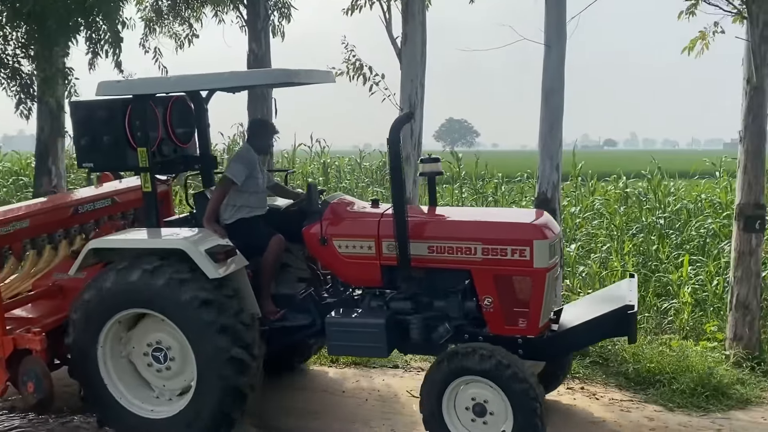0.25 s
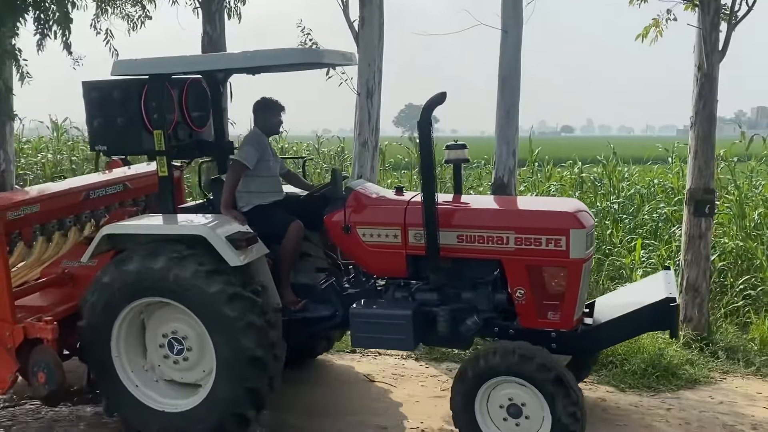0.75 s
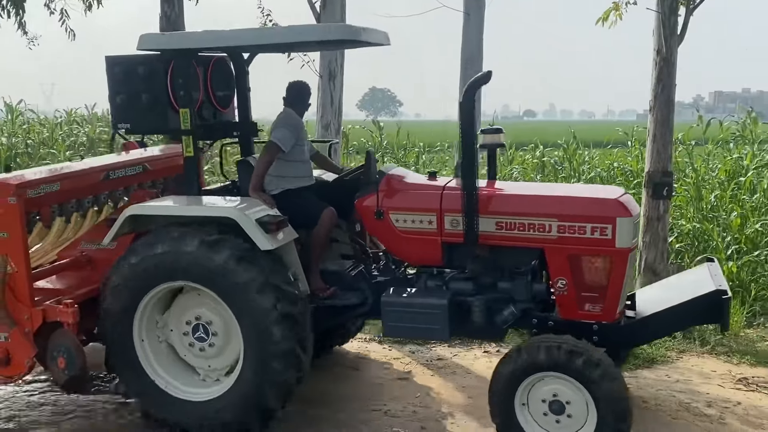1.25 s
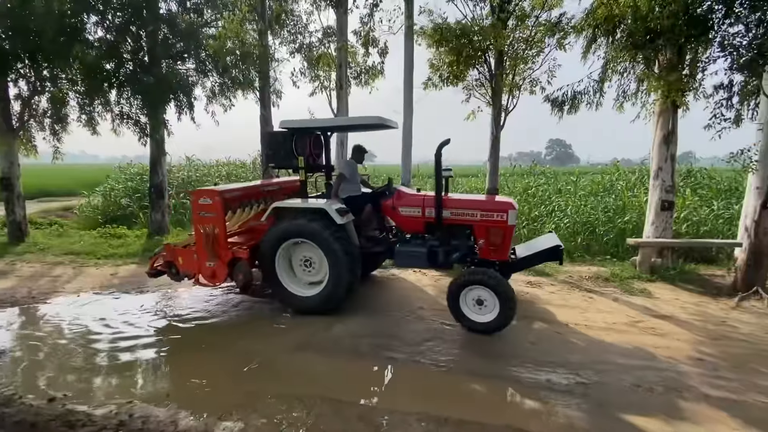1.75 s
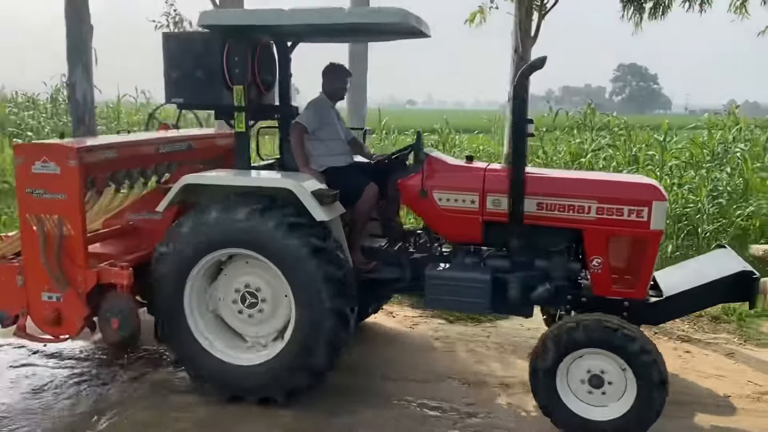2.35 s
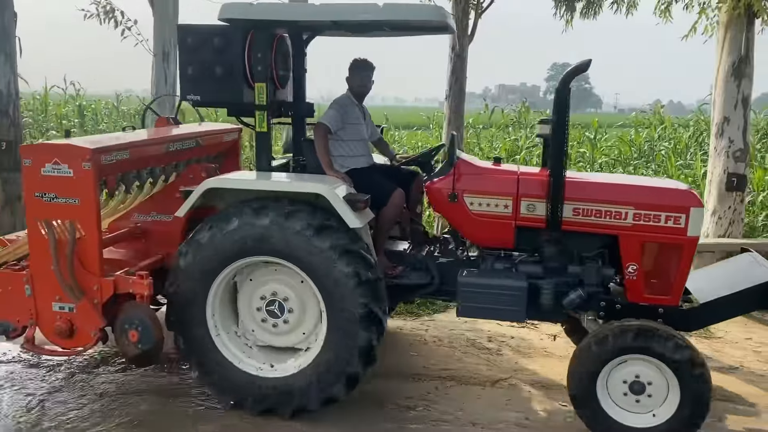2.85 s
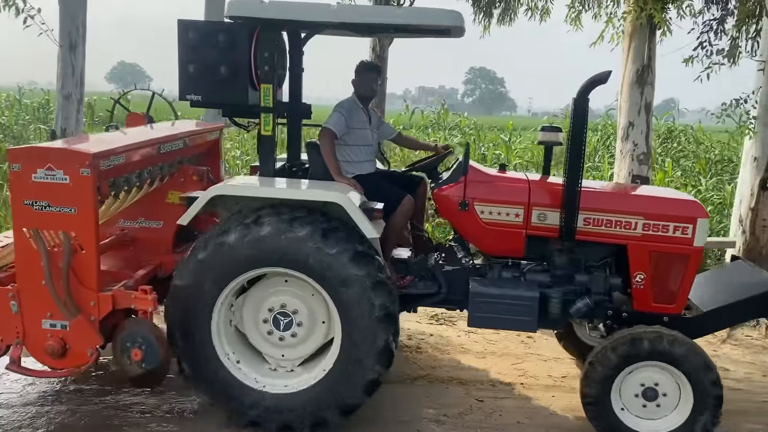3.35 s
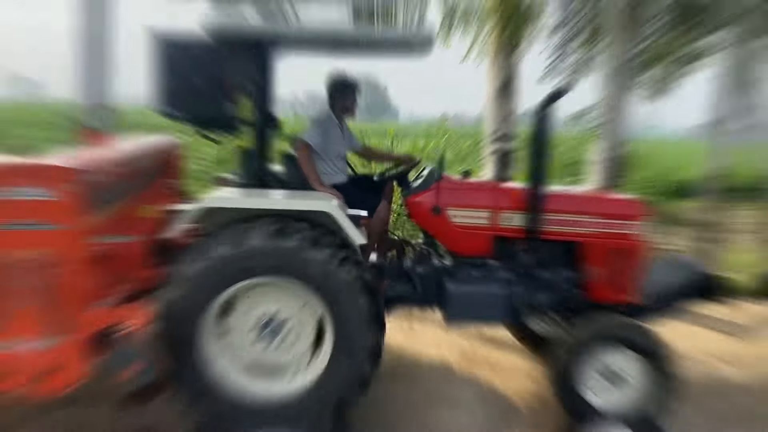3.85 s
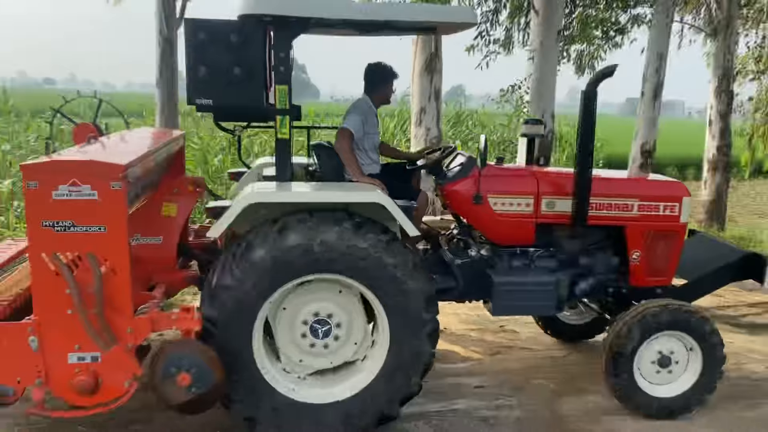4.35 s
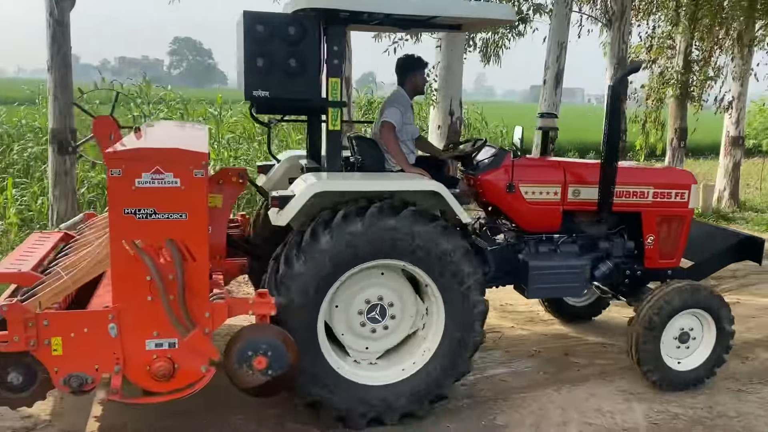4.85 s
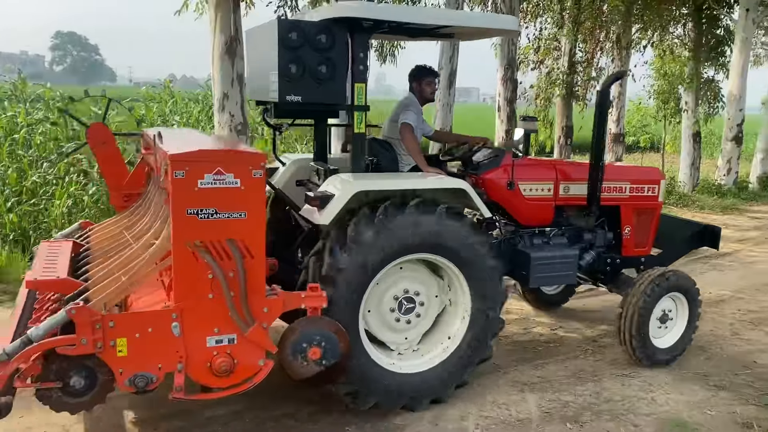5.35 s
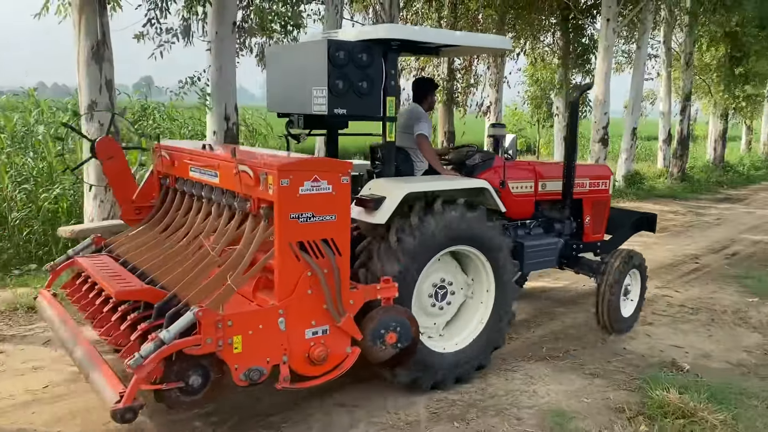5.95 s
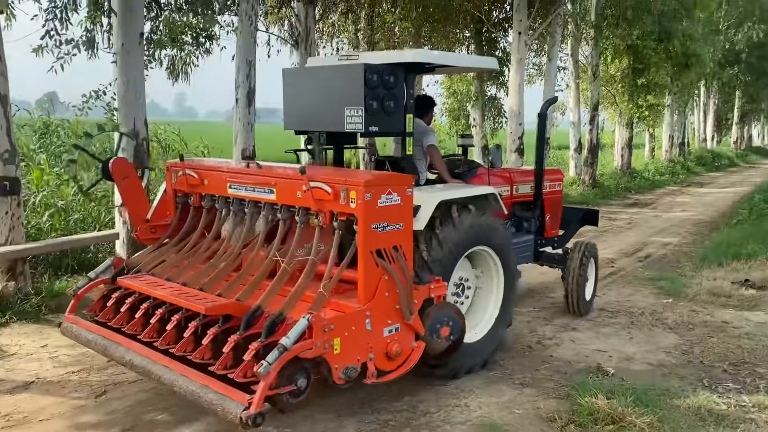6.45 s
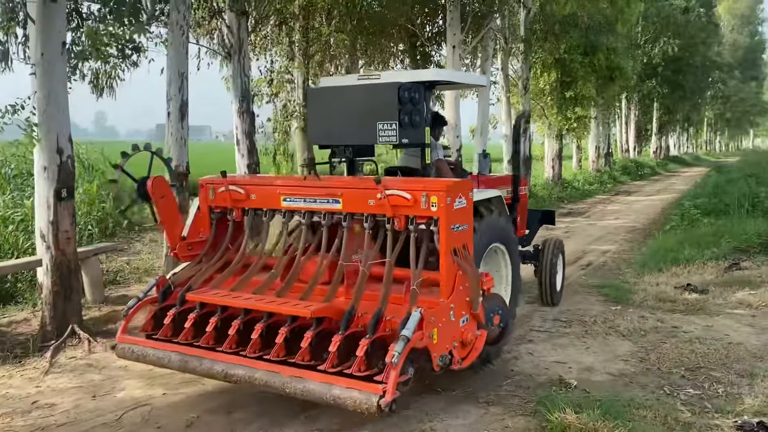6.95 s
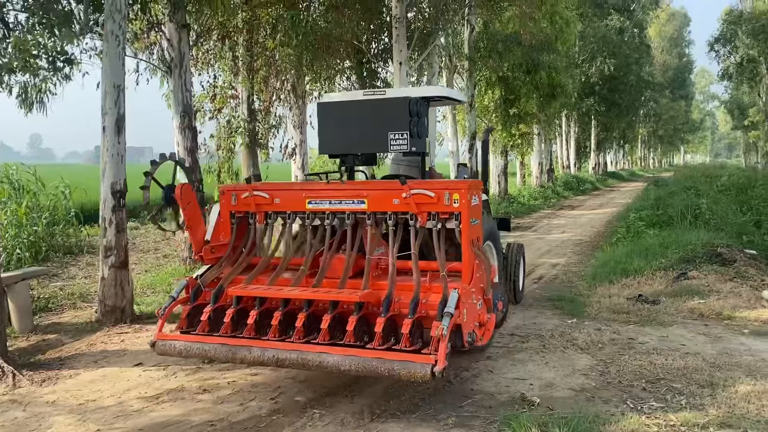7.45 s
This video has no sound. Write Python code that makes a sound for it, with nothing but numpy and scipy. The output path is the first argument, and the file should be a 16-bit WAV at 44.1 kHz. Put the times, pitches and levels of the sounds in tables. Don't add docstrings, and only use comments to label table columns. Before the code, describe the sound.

A diesel tractor passes a few metres from a handheld phone outdoors, slightly left, with short diffuse reflections. From 0 to about 3.3 s the engine hunts at roughly 15 firings per second: bursts of hard, ringing knocks with sharp gas spit and hollow exhaust, strong around 0.2, 0.6, 0.9, 1.9 and 2.2 s, broken by weaker coasting beats. Gears and tinwork rattle continuously; small steel clinks come near 1.7 and 2.4-2.6 s. The beat quickens from 3.3 s. Just before 4 s everything drops to silence for a few hundredths of a second, then abruptly returns. Uneven surges continue, faster, with a more resonant pipe tone, until 5.5 s. Then the knocking drops sharply to an even, low three-cylinder chug of about 24 firings per second, growing duller behind the implement. Three low metallic clanks fall at 6.8-6.9 s, a faint high ting at 7.4 s; the engine is still running at 7.7 s.

```python
import sys
import numpy as np
from scipy import signal
from scipy.fft import rfft, irfft
from scipy.io import wavfile
from scipy.ndimage import uniform_filter1d

SR = 44100
rng = np.random.default_rng(int(sys.argv[2]) if len(sys.argv) > 2 else 0)


def invert_db(x):
    u = np.asarray(x, float) / 20
    return 10 ** u


def unload_audio(sound):
    columns = np.transpose(np.atleast_2d(sound))
    steps = np.round(np.clip(columns, -1, 1) * 32767)
    wavfile.write(sys.argv[1], SR, steps.astype(np.int16))


N = 338688

# (first firing [s], last firing [s], first knock [dB], last knock [dB], exhaust [dB])
SURGES = [(0.1023, .1039, -9.5, -7, -16.5), (.171, .2331, 0, -10, -7.5), (.51, .6464, -5.5, -1, -10),
          (0.9249, .9893, -0.5, -1.5, -7), (1.473, 1.5957, -7.5, -10.5, -13.5),
          (1.853, 1.9845, 1.5, -2, -10.5), (2.1931, 2.257, 2.5, 1.5, -10), (2.317, 2.3167, -29, -35, -15.5),
          (2.6033, 2.6628, -5, -4.5, -15.5), (2.7103, 2.7114, -3, -5, -5.5),
          (3.3547, 3.5768, -12, -6.5, -7), (3.7529, 3.8612, 1, -3, -9), (4.071, 4.2597, -5, -7, -9),
          (4.503, 4.5835, -11, -9.5, -12), (4.7698, 4.9034, -13.5, -12.5, -18.5),
          (5.1088, 5.205, -3.5, -6, -12.5), (5.3272, 5.3729, -10.5, -6, -15),
          (5.4148, 5.4998, -0.5, -4.5, -11)]
# (first firing [s], last firing [s], first knock [dB], last knock [dB], exhaust [dB])
COASTS = [(0.0525, .0512, -7.5, -21, -31), (0.3184, .384, -20.5, -20, -41), (0.4603, .4595, -8, -3, -33),
          (0.7331, .875, -9, -7.5, -35), (1.134, 1.1348, -25, -22, -23), (1.2015, 1.271, -9.5, -3.5, -26),
          (1.3352, 1.3359, -6.5, -4, -16), (1.4025, 1.4034, -7, -8.5, -40),
          (1.6656, 1.805, -6.5, -7.5, -29.5), (2.0793, 2.1282, -9, -5, -24),
          (2.4, 2.5382, -15.5, -6.5, -47), (2.799, 2.7994, -26, -26, -31), (2.9145, 2.976, -15, -21, -23),
          (3.1105, 3.248, -10.5, -10, -32), (3.3107, 3.3119, -7.5, 2, -14.5), (3.6443, 3.709, -16, -7, -33),
          (4.0349, 4.0349, -16, -15, -40), (4.318, 4.4537, -36, -11.5, -45),
          (4.6358, 4.7245, -11.5, -10, -22), (4.9475, 5.036, -13, -12, -24),
          (5.0765, 5.0774, -15, -15, -13.5), (5.2486, 5.2947, -29, -13.5, -21.5)]
# (time [s], rate [firings per s])
HUNTING_PACE = [(0, 15), (3.2, 15), (3.5, 18), (4.1, 21), (4.5, 22.5), (5.5, 23)]
# (time [s], loudest block mode [Hz], extra spit [dB])
BITES = [(.171, 2370, -5), (.576, 2000, -1), (.801, 2270, -12), (.925, 1370, -2.5), (.989, 1240, -3),
         (1.2, 1770, 6), (1.81, 1730, 17), (1.92, 2630, 1.5), (1.985, 1970, 0.5), (2.128, 1020, 31),
         (2.193, 2410, 1), (2.257, 840, -1), (2.4, 2310, 4), (2.6, 1700, -5), (2.711, 2250, -0.5),
         (3.354, 1830, 4.5), (3.42, 2590, -2), (3.474, 2410, 1), (3.709, 1830, 10), (3.753, 2070, 1.5),
         (3.808, 2400, 1.5), (3.861, 2040, -2.5), (4.071, 2250, -3), (4.121, 2360, 4), (4.217, 1500, -6),
         (4.454, 1800, -0.5), (5.108, 1570, 2), (5.373, 2210, -3), (5.458, 1730, 0), (5.5, 1750, 0.5)]
# (time [s], knock [dB], exhaust [dB], bark re exhaust [dB])
EVEN_RUNNING = [(5.55, -21.5, -22, -7), (6.0, -25.5, -23, -15), (6.35, -27, -27.5, -7), (6.7, -27, -26, -4),
                (7.0, -33.5, -28.5, 1), (7.3, -26.5, -19, -3.5), (7.68, -29, -34, 10.5)]
# (time [s], firings gone by [count])
EVEN_BEAT = [(5.552, 0), (5.679, 3), (6.046, 12), (6.291, 18), (6.42, 21), (6.796, 30), (7.05, 36),
             (7.3, 42), (7.427, 45), (7.672, 51)]
# (lag [s], knock [dB], exhaust [dB])
CYLINDERS = [(0.0034, 1, 2), (-0.0045, 3, 5), (0.0002, 1, 4)]
# (frequency [Hz], width [Hz], level [dB])
BLOCK_MODES = [(620, 90, -15), (790, 100, -11), (1070, 90, 0), (1220, 110, -2), (1480, 120, -5),
               (1770, 130, -5), (2040, 130, -4), (2280, 130, -3), (2510, 140, -5), (2700, 140, -7),
               (3000, 200, -10), (3750, 160, -8)]
# (frequency [Hz], level [dB per Hz])
KNOCK_SPECTRUM = [(300, -3), (500, -30), (700, -33), (1100, 5), (2400, 8.5), (3000, -49), (4000, -55),
                  (6000, -22), (16000, -23)]
# (frequency [Hz], level [dB per Hz])
SPIT_SPECTRUM = [(2000, -16), (3500, 8.5), (5000, 3), (6500, 5.5), (8000, 9.5), (11000, 5), (13000, 6.5),
                 (16000, -2)]
# (time [s], loss [dB per kHz])
IMPLEMENT_SHADE = [(5.4, 4), (6.3, 4), (7.0, 7), (7.68, 23)]
# (frequency [Hz], level [dB per Hz])
PUFF_SPECTRUM = [(20, 6.5), (60, 6), (100, 6), (150, 0), (200, -5.5), (330, -16), (500, -41), (900, -20)]
# (multiple of pipe frequency [ratio], t60 [s], level [dB], share of overtone level [0 to 1])
PIPE_PARTIALS = [(1, 0.24, 3, 0.23), (.87, 0.11, -1, 0.0095), (1.7, 0.12, -3.5, 0.44), (1.98, 0.17, 1, 1),
                 (2.2, 0.071, 1, 1)]
# (time [s], silencer [Hz], pipe [Hz], pipe overtone re pipe [dB])
EXHAUST_TUNING = [(0, 46, 242, -19), (1.0, 47, 241.2, -18.5), (2.3, 45.7, 236, -13.5),
                  (2.72, 48.4, 245, -14.5), (3.3, 47, 236, -19), (3.57, 54, 250, -24.5),
                  (3.9, 55.6, 247, -21), (4.2, 48.7, 250.3, -19), (4.6, 47, 245.2, -1.5),
                  (5.3, 48, 258.4, -1), (6.2, 48, 243.7, -4.5), (6.6, 48, 256, -13.5),
                  (7.3, 48, 255.6, -13)]
# (time [s], level [dB], frequency [Hz], t60 [s], scrape or hiss
# [dB])
CLINKS = [
    (6.805, -19, 2270, 0.15, -42),
    (6.865, -18.5, 2260, 0.13, -31),
    (6.915, -21, 2280, 0.099, -45),
    (6, -48, 10900, .06, -48),
    (7.42, -36.5, 10770, 0.27, -35),
    (1.7, -40.5, 7600, .04, -18),
    (1.51, -47, 9000, .04, -22.5),
    (2.42, -19, 4200, .06, -28),
    (2.615, -23, 7000, .08, -22),
    (4.6, -38, 3600, .05, -33),
]
# (frequency [Hz], level [dB per Hz])
RATTLE_SPECTRUM = [(18, -40), (40, 3), (110, -3.5), (250, -5), (420, -7.5), (670, -21), (1080, -11),
                   (1670, -16), (2500, -18.5), (3300, -29), (4500, -35), (6500, -40.5), (11000, -48),
                   (16000, -69)]
# (time [s], level [dB])
SHAKING = [(0, -19), (.7, -16.5), (1.05, -15.5), (1.28, -19.5), (1.45, -13), (1.8, -15), (2.08, -9),
           (2.31, -17), (3.2, -17), (3.4, -10.5), (3.9, -16.5), (4.47, -17), (5.2, -13.5), (5.6, -14),
           (6.0, -19.5), (7.1, -21.5), (7.68, -21)]
# (time [s], treble [dB])
ENGINE_FACING = [(0, 9.5), (2.3, 6.5), (4.5, 4.5), (6.0, 1), (7.3, 7.5), (7.68, -0.5)]
# (time [s], left-right level [dB], share of the port delay [ratio])
BEARING = [(0, -2.1, .7), (1.2, -2.1, .7), (1.6, -2.2, 1.1), (4.2, -2.4, 1.05), (5.5, -2.9, .9),
           (6.5, -2, .7), (7.68, -1.6, .6)]
# (frequency [Hz], phase by which left leads [rad], left-right level [dB])
PORTS = [(100, 0, 0), (600, .15, .8), (1100, -.2, 2.6), (2000, -.6, 4.2), (3300, -.9, 5.4), (6000, -1.3, 5),
         (10000, -1.6, 2.2), (14000, -1.9, 2.4)]
# (frequency [Hz], likeness [0 to 1])
PORT_LIKENESS = [(60, .96), (130, .94), (300, .98), (640, .95), (1400, .9), (2800, .84), (5500, .62),
                 (10000, .82)]
# (frequency [Hz], level [dB])
OVERALL_COLOUR = [(15, -50), (27, -29), (36, -4), (45, -2.5), (7500, -0.5), (8400, -4), (9000, -25), (9700, -3),
                  (10800, 3.5), (12000, -1.5), (13300, -21), (14600, -5.5), (15600, -16)]
# (time [s], level [dB])
DROPOUT = [
    (3.93, 0),
    (3.958, -4),
    (3.965, -36),
    (3.99, -75),
    (4.0, -60),
    (4.012, -20),
    (4.035, 0),
]


def evened(x):
    return x / np.sqrt(np.mean(x ** 2) + 1e-20)


def at_time(points, s):
    return np.interp(s, *np.transpose(points))


def read(points, hz, order=1):
    p = np.transpose(points)
    return np.interp(np.log(hz + 1), np.log(p[0] + 1), p[order])


def add(mix, s, sound):
    part = mix[..., max(round(s * SR), 0):][..., :sound.shape[-1]]
    part += sound[..., :part.shape[-1]]


def colour(x, points):
    db = np.maximum(read(points, abs(np.fft.fftfreq(8192, 1 / SR))), -90)
    log_gain = np.log(invert_db(db))
    taps = np.fft.ifft(np.exp(log_gain - 1j * signal.hilbert(log_gain).imag)).real[:4096]
    return signal.oaconvolve(x, taps / np.linalg.norm(taps))[:len(x)]


def group(first, last, first_db, last_db, exhaust_db, fuel):
    gaps = round((last - first) * at_time(HUNTING_PACE, (first + last) / 2))
    u = np.linspace(0, 1, gaps + 1)
    arch = 4 * u * (1 - u)
    loose = rng.standard_normal((len(u), 3)).T
    s = first + (last - first) * u + fuel * 0.5 * (last - first) ** 2 * u * (1 - u)
    knock = first_db + (last_db - first_db) * u + fuel * 3.5 * max(gaps - 2, 0) * arch
    spread_db = (1 - fuel) * 1.5
    if fuel:
        spit = -3 + 0.82 * knock + 0.79 * exhaust_db - 0.87 * s
    else:
        spit = -50 + .5 * spread_db * loose[0]
    mode_hz = np.where(loose[0] > 0, 1070, 1220)
    boom = exhaust_db - 4 + spread_db * loose[1]
    pipe = exhaust_db + 2 + spread_db * loose[2]
    return np.transpose([s, knock, spit, mode_hz, boom, pipe])


def firings():
    surges = [group(*row, fuel=1) for row in SURGES]
    coasts = [group(*row, fuel=0) for row in COASTS]
    rows = np.vstack(surges + coasts)
    rows = rows[np.argsort(rows[:, 0])]
    for s, hz, extra_db in BITES:
        k = abs(rows[:, 0] - s) < .015
        rows[k, 2] += extra_db
        rows[k, 3] = hz
    bark_db = 0.94 * rows[:, 4] + 0.58 * rows[:, 5] - 3.0
    hunting = np.column_stack([rows, bark_db])

    s, *columns = np.transpose(EVEN_RUNNING)
    at = np.interp(np.arange(52), *np.transpose(EVEN_BEAT)[::-1])
    knock, boom, bark = (np.interp(at, s, c) for c in columns)
    lag, knock_db, exhaust_db = np.array(CYLINDERS)[np.arange(len(at)) % 3].T
    loose_db = np.array([.8, .9])[:, None] * rng.standard_normal((len(at), 2)).T
    even = [at + lag, knock + 9.9 + knock_db + loose_db[0], knock - 20.0, np.where(lag < 0, 1200, 1080),
            boom - 1.5 + exhaust_db, boom + 1.3 + exhaust_db + loose_db[1], boom + bark + loose_db[1]]
    return np.vstack([hunting, np.transpose(even)])


def block(rows):
    t = np.arange(3500) / SR
    ring, broad, spit = np.zeros((3, N))
    hz, width, db = np.transpose(BLOCK_MODES)
    decay = np.exp(-np.pi * width[:, None] * t)
    for s, knock_db, spit_db, loud_hz, *_ in rows:
        shade_db = at_time(IMPLEMENT_SHADE, s)
        u = t / rng.uniform(0.6, 1.52)
        shake = (u / 0.0036) ** 1.09 * np.exp(-u / 0.0041)
        shake += 0.21 * rng.random() * np.exp(-((u - .022) / 0.0043) ** 2)
        shake += 0.075 * (1 - np.exp(-t / 0.0005)) * np.exp(-t / 0.045)
        weight = invert_db(db + 2.6 * rng.standard_normal(len(hz)) - shade_db * hz / 1000)
        mode_hz = hz[:, None] * rng.uniform(0.966, 1.05, (len(hz), 1))
        modes = weight @ (decay * np.sin(2 * np.pi * mode_hz * t))
        modes += 1.5 * np.exp(-np.pi * 130 * t) * np.sin(2 * np.pi * loud_hz * t)
        rough, more, jet = rng.standard_normal((3, len(t)))
        puff = np.exp(-((u - .009) / 0.0057) ** 2)
        hiss = 0.071 * (1 - np.exp(-t / 0.018)) * np.exp(-t / 0.058)
        rung = evened(signal.fftconvolve(shake * rough, modes)[:len(t)])
        add(ring, s - .003, invert_db(knock_db) * rung)
        add(broad, s - .003, invert_db(knock_db - 0.28 * shade_db) * shake * more)
        add(spit, s - .003, invert_db(spit_db) * jet * (puff + hiss))
    knocks = invert_db(-14.0) * ring + invert_db(-2.0) * colour(broad, KNOCK_SPECTRUM)
    return knocks + invert_db(-4.0) * colour(spit, SPIT_SPECTRUM)


def exhaust(rows):
    tone, blast, t = np.zeros(N), np.zeros(N), np.arange(6000) / SR
    fast = rows[:, 0] > 4.33
    opens = np.where(fast, uniform_filter1d(rows[:, 0], size=3, mode="nearest"), rows[:, 0])
    gaps = np.clip(np.diff(opens, append=opens[-1] + .041), .035, .08)
    s, *columns = np.transpose(EXHAUST_TUNING)
    silencer_hz, pipe_hz, over_db = (np.interp(opens, s, c) for c in columns)
    heat = signal.lfilter([0.25], [1, 0.25 - 1], invert_db(rows[:, 5]))
    pipe_hz = pipe_hz * (1 + 0.12 * (heat - heat.mean()))
    silencer_hz = np.where(fast, 2 / gaps, silencer_hz)
    for k, (boom_db, pipe_db, bark_db) in enumerate(rows[:, 4:]):
        damping = 1 + np.exp(np.clip((t - gaps[k] - .003) / 0.006, -50, 50))
        held = (1 - np.exp(-t / 0.0059)) / damping
        boom = -np.cos(2 * np.pi * silencer_hz[k] * (t - .005)) * invert_db(boom_db + 5.5 - 60 * t / 1.17)
        bark = -np.cos(2 * np.pi * 146 * (t - .005)) * invert_db(bark_db + 7.0 - 60 * t / 1.8)
        pipe = np.zeros(len(t))
        for multiple, t60, db, over in PIPE_PARTIALS:
            level_db = db + over * (over_db[k] + 3.1 * rng.standard_normal())
            cycles = multiple * pipe_hz[k] * t + 0.086 * rng.standard_normal()
            pipe += invert_db(level_db - 60 * t / t60) * np.sin(2 * np.pi * cycles)
        dip = opens[k] + (.003 if fast[k] else .011)
        add(tone, dip - .005, held * (boom + (1 if fast[k] else .25) * bark))
        add(tone, opens[k] + .002, held * invert_db(pipe_db + 5.5) * pipe)
        add(blast, dip - .002, -invert_db(bark_db) * np.exp(-t[:300] / 0.00065))
    return tone + invert_db(11.0) * colour(blast, PUFF_SPECTRUM)


def clinks():
    out, t = np.zeros(N), np.arange(12000) / SR
    for s, db, hz, t60, scrape_db in CLINKS:
        wobble = evened(uniform_filter1d(rng.standard_normal(len(t)), size=250))
        chatter = 1 + 0.92 * (hz < 8000) * wobble
        ring = invert_db(db - 60 * t / t60) * chatter * np.sin(2 * np.pi * hz * t)
        grit = signal.lfilter([1, .8], [1], rng.standard_normal(len(t)))
        scrape = invert_db(scrape_db - 60 * t / 0.18) * grit
        add(out, s, (ring + scrape) * (1 - np.exp(-t / 0.0014)))
    return out


def rattle(rows):
    tick_level = invert_db(2.5 * np.minimum(rng.exponential(1, N), 4))
    ticks = tick_level * (rng.random(N) < 2500 / SR) * rng.choice([-1, 1], N)
    beat = np.zeros(N)
    beat[np.minimum(rows[:, 0] * SR, N - 1).astype(int)] = 1
    beat = signal.lfilter([1], [1, -np.exp(-1 / (0.069 * SR))], beat)
    drive = (0.81 * evened(ticks) + rng.standard_normal(N)) * (1 + 0.09 * beat)
    hz, t, z = signal.stft(drive, SR, nperseg=1024, noverlap=768)
    patches = uniform_filter1d(rng.standard_normal(z.shape), 8, 0)
    patches = evened(uniform_filter1d(patches, 10, 1))
    s, level_db = np.transpose(SHAKING)
    low_db = 3.1 - 0.4 * (level_db - level_db.mean())
    low = 1 / (1 + (hz / 600) ** 4)
    top = 1 / (1 + (3500 / (hz + 1)) ** 4)
    db = read(RATTLE_SPECTRUM, hz)[:, None] + 2.44 * patches
    db += np.outer(low, np.interp(t, s, low_db)) + np.outer(top, at_time(ENGINE_FACING, t))
    x = evened(signal.istft(z * invert_db(db), SR, nperseg=1024, noverlap=768)[1][:N])
    return x * invert_db(0.5 + at_time(SHAKING, np.arange(N) / SR))


def yard(x, t60=.2):
    t = np.arange(8000) / SR
    sparse = (rng.random(len(t)) < .05) * (t > .002)
    taps = rng.standard_normal(len(t)) * sparse * invert_db(-60 * t / t60)
    return signal.oaconvolve(x, taps / np.linalg.norm(taps))[:N]


def ports(x, other):
    hz, t, z = signal.stft(np.array([x, other]), SR, nperseg=512, noverlap=384)
    s, pan_db, delay = np.transpose(BEARING)
    half = invert_db((read(PORTS, hz, order=2)[:, None] + np.interp(t, s, pan_db)) / 2)
    half = half * np.exp(.5j * read(PORTS, hz)[:, None] * np.interp(t, s, delay))
    apart = np.sqrt(1 - np.clip(read(PORT_LIKENESS, hz), 0, 1))[:, None] * z[1]
    left, right = (z[0] + apart) * half, (z[0] - apart) / half
    return signal.istft([left, right], SR, nperseg=512, noverlap=384)[1][:, :N]


def scene():
    rows = firings()
    hard = block(rows) + clinks()
    near = hard + invert_db(-6.5) * yard(hard) + exhaust(rows) + rattle(rows)
    return ports(near, yard(near, t60=.08))


def roll_off(x):
    return signal.sosfilt(signal.butter(12, 15700, fs=SR, output="sos"), x)


def record(dry):
    x = irfft(rfft(dry) * invert_db(read(OVERALL_COLOUR, np.fft.rfftfreq(N, 1 / SR))), N)
    x = np.clip(x, -1, 1)
    x = x * invert_db(at_time(DROPOUT, np.arange(N) / SR))
    return roll_off(x)


dry = scene()
out = record(dry)
unload_audio(out)
```